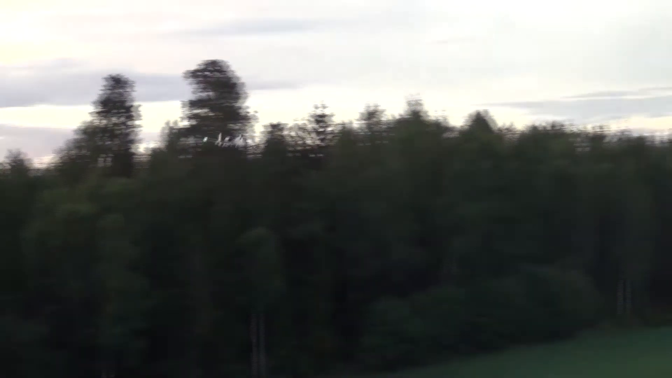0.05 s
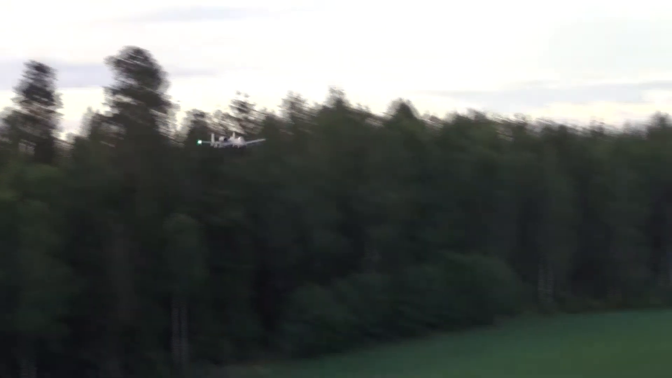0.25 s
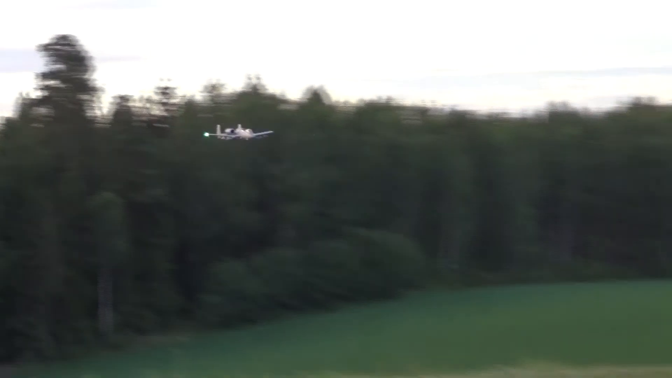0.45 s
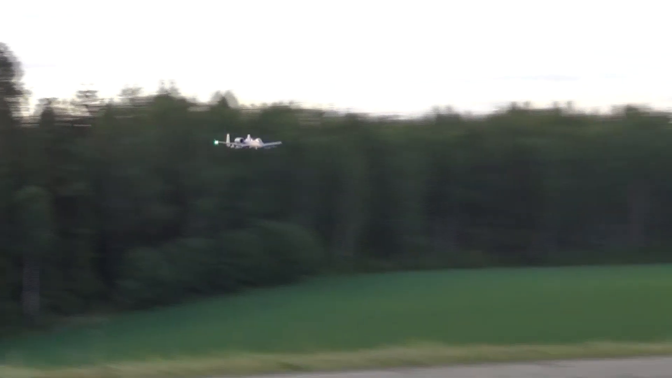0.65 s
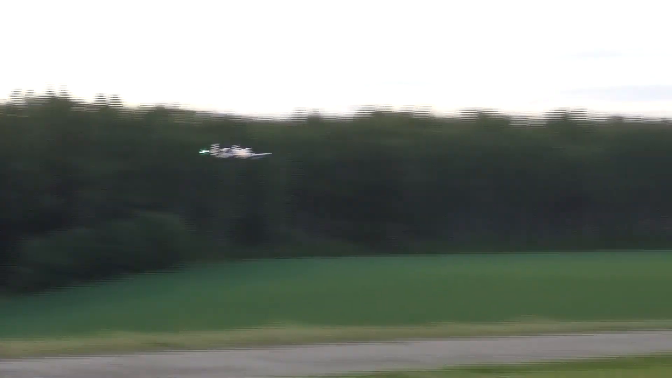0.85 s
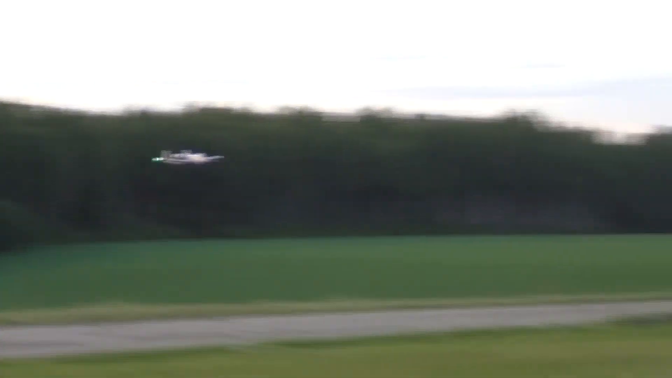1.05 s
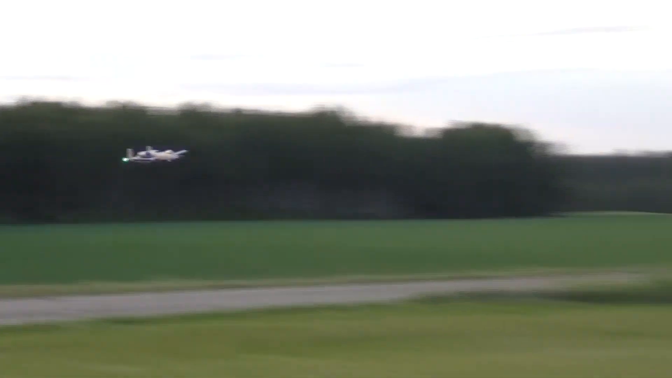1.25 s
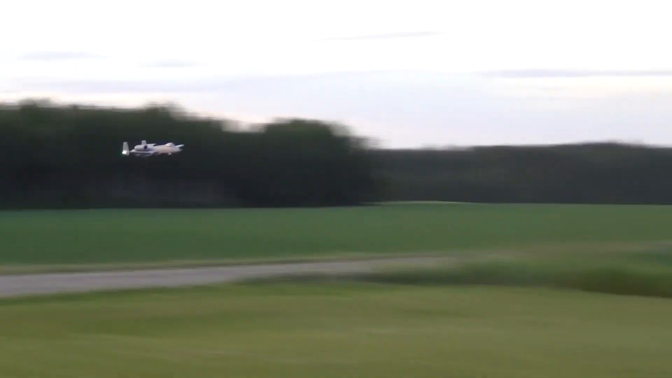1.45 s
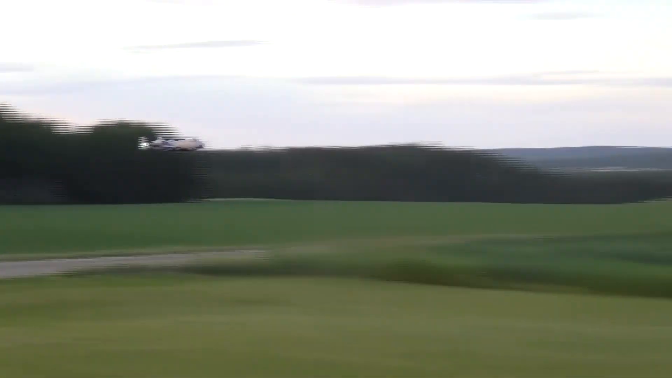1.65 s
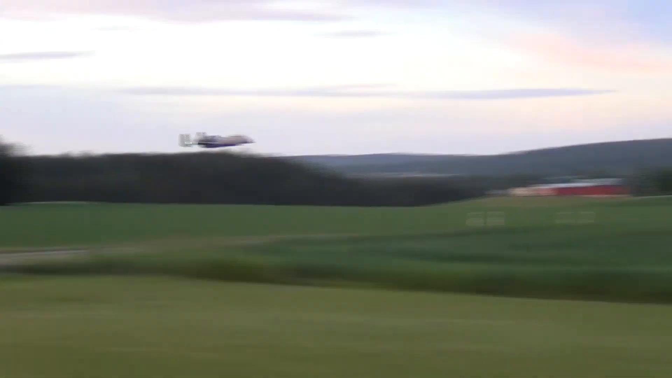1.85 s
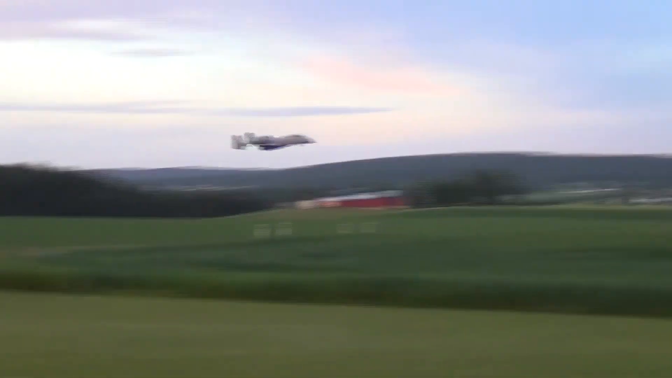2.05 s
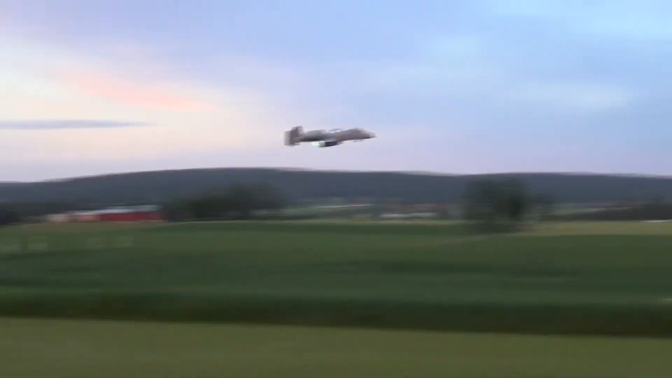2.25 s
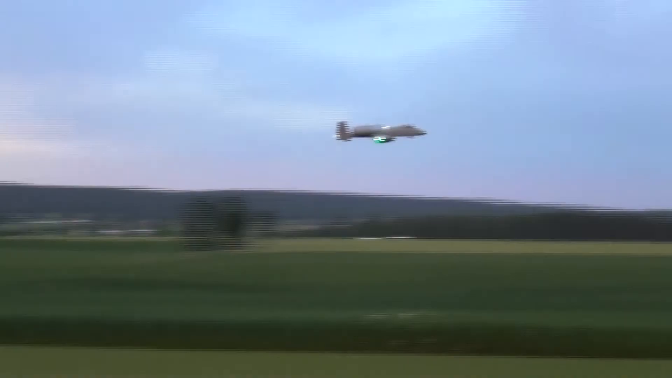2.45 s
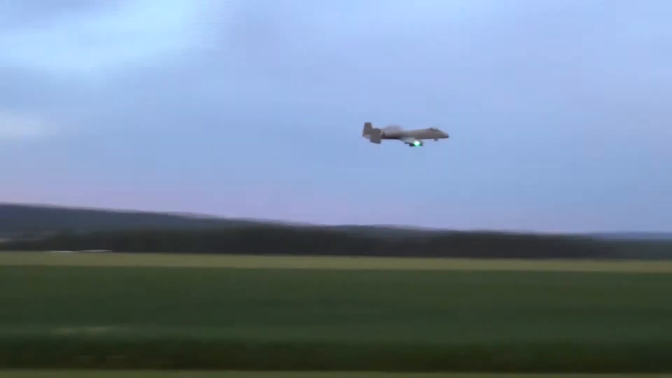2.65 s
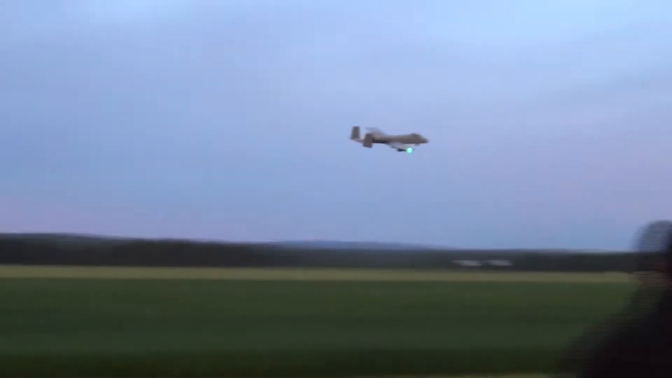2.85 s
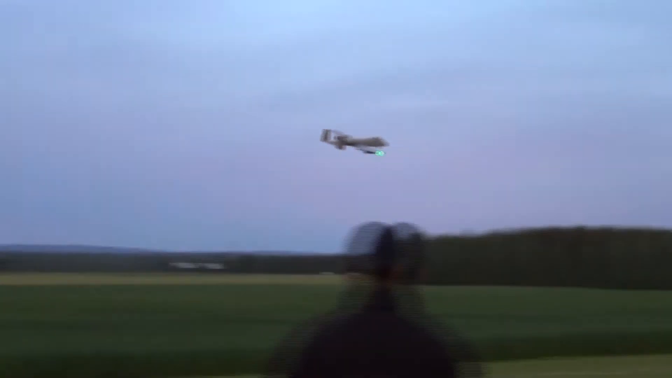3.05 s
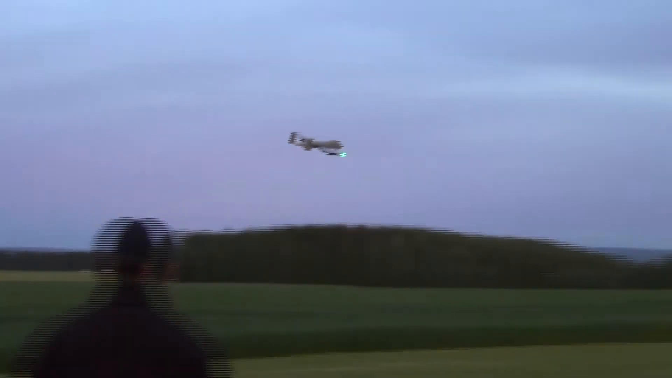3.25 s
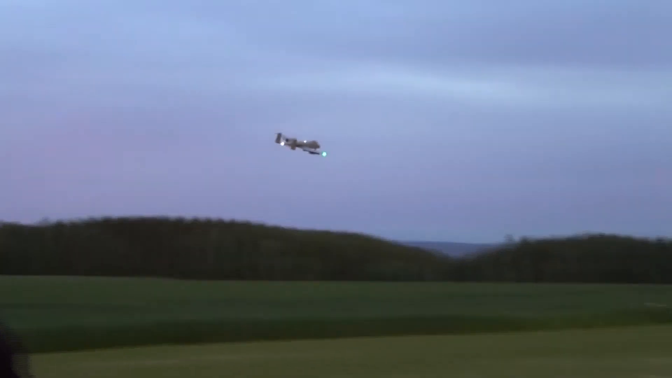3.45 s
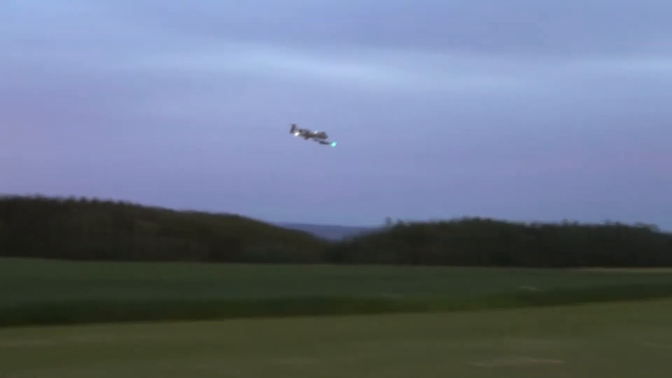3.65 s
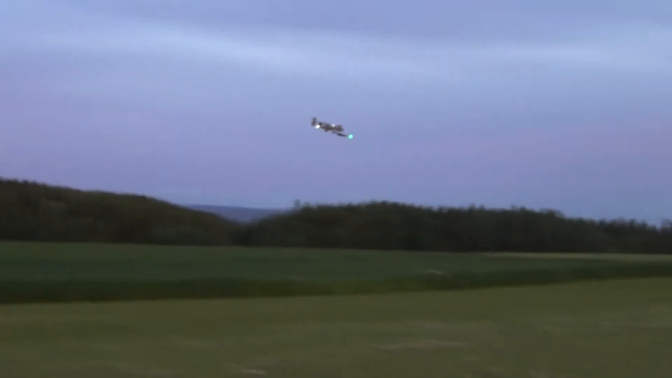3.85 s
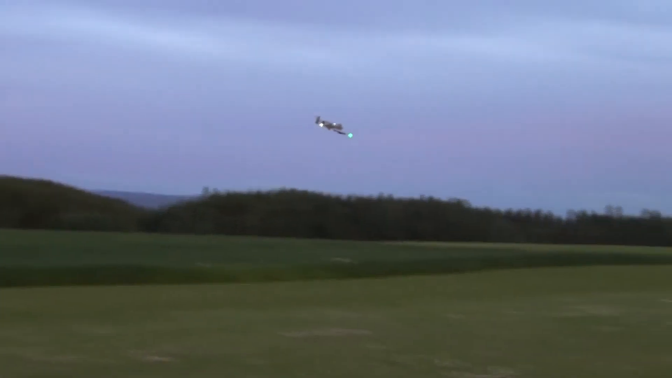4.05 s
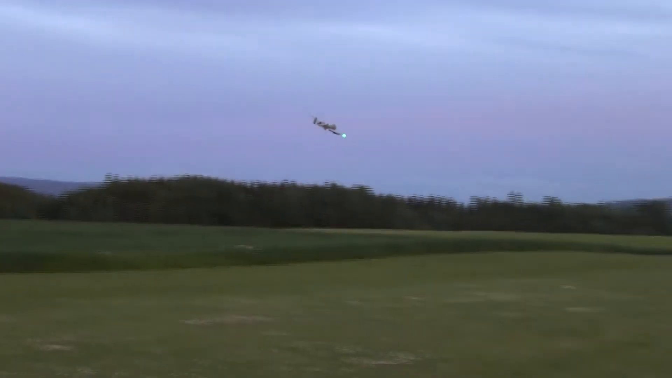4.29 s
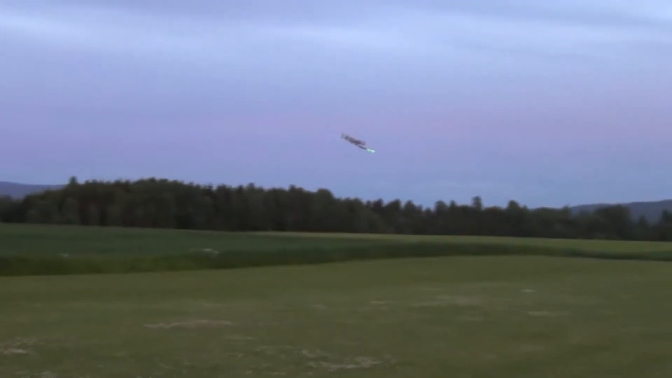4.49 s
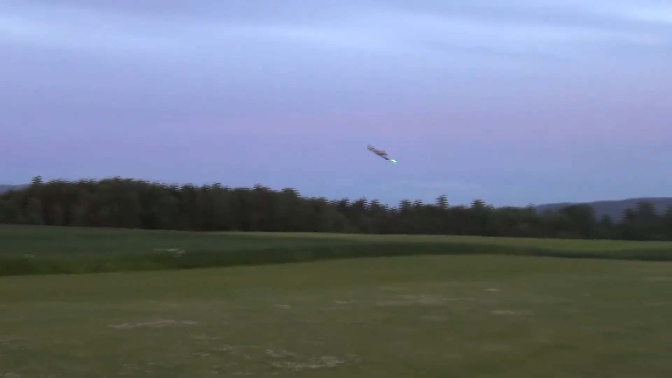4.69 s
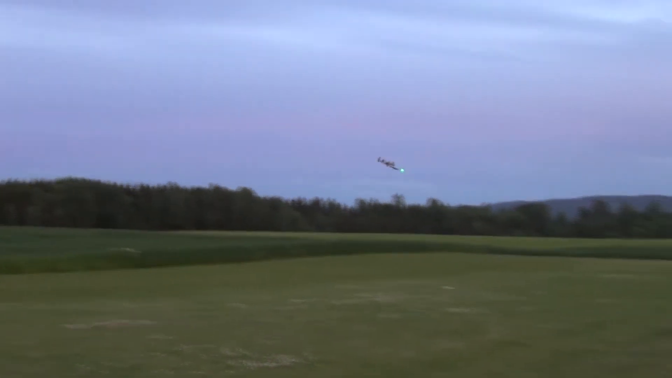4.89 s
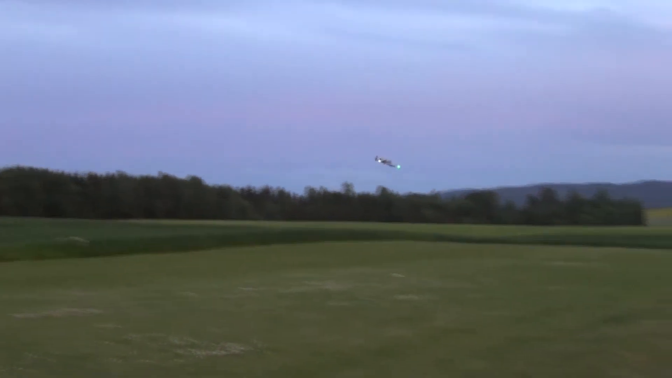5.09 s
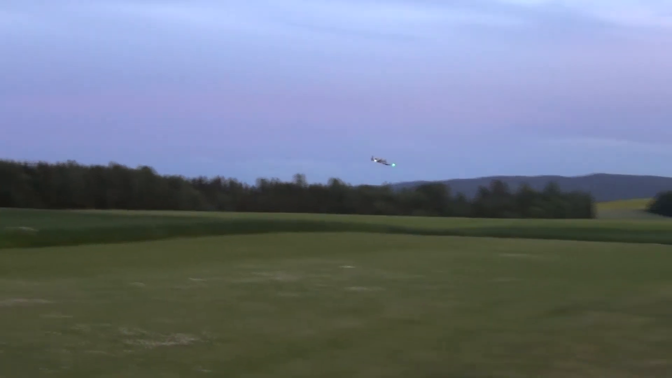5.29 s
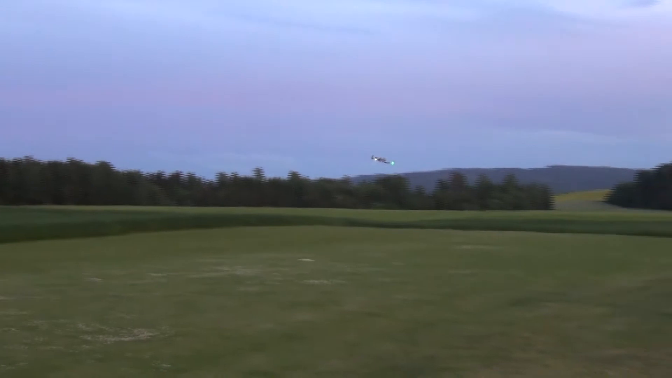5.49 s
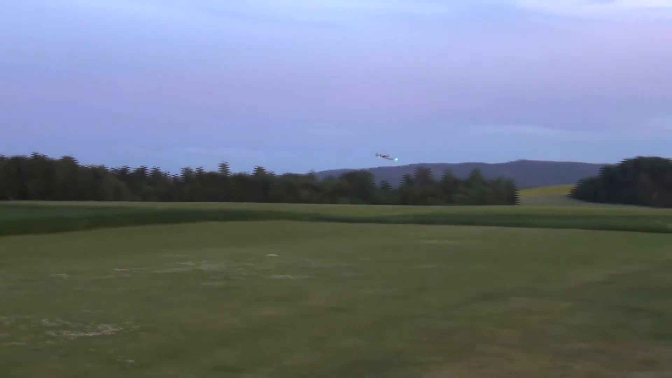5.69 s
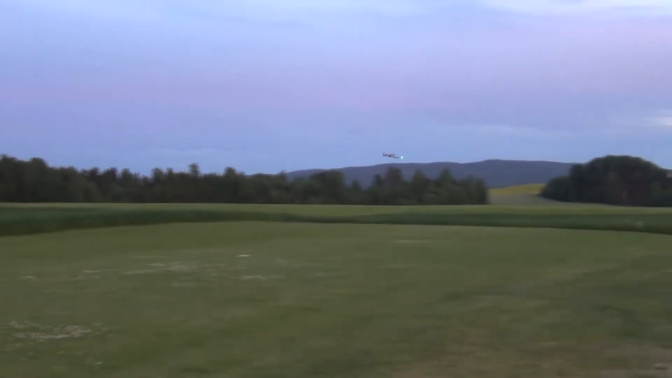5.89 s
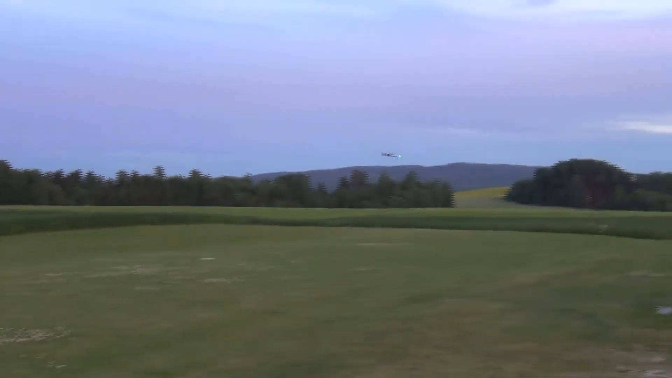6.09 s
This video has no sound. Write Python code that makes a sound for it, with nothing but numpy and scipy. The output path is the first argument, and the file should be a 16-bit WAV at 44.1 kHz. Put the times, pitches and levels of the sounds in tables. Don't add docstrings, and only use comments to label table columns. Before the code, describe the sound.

In open air over a grass field, a small electric jet with two ducted fans is already approaching at 0 s, giving a hard, piercing whine near 3.8 kHz, with fainter whistles above it and a broad, rushing air roar. The two fans are slightly detuned, so the tone beats and shimmers, swelling irregularly. Light wind bumps build from about 0.7 s, and at 1.1 s a strong, low gust thuds and rumbles on the close stereo microphone, thinning gradually until about 2.6 s. Around 2 to 3 s the jet passes nearest and every tone glides smoothly downward, reaching roughly 3.2 kHz. From 3 s the wind is nearly gone; the jet recedes as a lower, weaker, fluttering whine and hiss, its upper sound dulling further around 4.5 s. A small wind tick comes near 4.8 s. By 6 s the distant whine is still audible, wavering over faint hiss.

```python
import sys
import numpy as np
from scipy import signal
from scipy.fft import rfft, irfft, next_fast_len
from scipy.io import wavfile
from scipy.ndimage import uniform_filter1d, map_coordinates

SR = 44100
rng = np.random.default_rng(int(sys.argv[2]) if len(sys.argv) > 2 else 0)


def persist_wave(psi):
    counts = np.round(np.clip(psi, -1, 1) * 32767).astype(np.int16)
    wavfile.write(sys.argv[1], SR, np.atleast_2d(counts).T)


def undo_db(level):
    steps = np.asarray(level, float) / 20
    return 10 ** steps


N = 270316

HISS_DB, FIELD_DB = -63, -80.5

# start_s, level_db
DRAUGHT = [(0, -58), (.38, -51), (.63, -55), (1.09, -64), (1.13, -35.5), (2.6, -41), (2.8, -48.5),
           (3.2, -56.5), (3.5, -69.5)]
# start_s, centre_hz, below_db_per_octave,
# above_db_per_octave
GUST_SPECTRUM = [(0, 88.5, 5.5, -5), (1.05, 90, 5, -8.5), (1.15, 136, 11, -8.5), (1.4, 198, 11.5, -9),
                 (1.7, 244, 10, -3.5), (2.4, 308, 12.5, -6), (3.0, 216, 9, -2), (3.5, 160, 11, -7),
                 (6.13, 160, 2, -18)]
# peak_s, peak_db, length_s
BUFFETS = [(.75, -39, 0.048), (0.908, -38, 0.079), (1.05, -37.5, 0.017), (1.138, -29, 0.018),
           (1.208, -30, 0.044), (1.315, -28.5, 0.12), (1.472, -30.5, 0.03), (1.638, -37, 0.062),
           (1.784, -33, 0.048), (1.973, -32, 0.051), (2.082, -36, 0.037), (2.3, -34.5, 0.088),
           (2.41, -32.5, 0.029), (2.56, -37.5, 0.18), (3.043, -50, 0.074), (3.31, -62, 0.056),
           (3.693, -67, .035), (3.835, -75, .022), (3.887, -65, .038), (4.293, -65, .036),
           (4.835, -49, 0.012), (4.862, -54, 0.03), (4.932, -67, .02), (5.03, -74, 0.053),
           (5.257, -74, .04), (5.431, -61, 0.0098), (5.76, -75, .03), (5.95, -70, .03)]

# start_s, centred_share (0-1)
CAMERA_SWING = [
    (0, 0.4),
    (2.2, 0),
    (3.4, 0.64),
    (6.13, 1),
]
# band_hz, left_minus_right_db
CAPSULES_LEFT = [(40, -4), (70, -11), (130, 3.5), (290, 0.2), (640, 1), (1350, 4), (1900, -1.5),
                 (2450, 2.7), (2900, -2), (3650, 2.16), (4600, -1.8), (7000, 1.8), (9500, 1.6), (15000, 2)]
# band_hz, left_minus_right_db
CAPSULES_CENTRED = [(60, -.5), (130, 5.5), (640, 2), (1400, 1.2), (2000, 1), (4500, 0.55), (7500, 1.3),
                    (10000, -7)]
BODY_NOTCH_HZ, BODY_NOTCH_WIDTH_HZ = 1823, 340

ABEAM_S, SPEED_M_S, SLOWING_M_S2, NEAREST_M = 2.50, 29.69, .52, 26.31
# start_s, jet_height_m, echo_strength (0-1)
FLIGHT_HEIGHT = [(0, 7.4, 0.05), (.8, 4.3, 0.2), (1.3, 3.26, 0.4), (1.8, 2.22, 0.3), (2.1, 3.15, 0.3),
                 (2.4, 3.56, 0.5), (2.8, 4.17, 0.32), (3.2, 5, 0.26), (3.6, 5.74, 0.42), (4.2, 6.37, 0.28),
                 (4.8, 6.7, 0.4), (5.6, 6.8, 0.32), (6.13, 7.9, 0.35)]
MIC_HEIGHT_M, GRASS_CUT_HZ, GRASS_TURN_RAD = 1.6, 4700, -1.35

# centre_s, half_length_s, gain_db, fast_fan_favour_db
FOCUSING_EDDIES = [(.15, 0.057, 4.5, -1.5), (0.69, 0.098, 7.5, 7), (0.957, 0.056, 9.5, 5.5),
                   (1.176, 0.11, 4.5, 6), (1.295, 0.057, 6.5, -6), (1.438, 0.044, 3.5, -9),
                   (1.558, 0.094, 4.5, -1), (1.764, 0.098, 7.5, 6), (1.96, 0.035, 5, -8.5),
                   (2.07, 0.047, 6.5, -0.5), (2.207, 0.035, 3, -3.5), (2.33, 0.06, 4, -1.5),
                   (2.505, 0.024, 5.5, 7.5), (2.616, 0.056, 5.5, 3), (2.785, 0.02, 6, 2),
                   (3.005, 0.1, 5, 6.5), (3.078, .015, 4.5, 7), (3.213, 0.075, 3, -3.5),
                   (3.414, 0.06, 6, 8.5), (3.63, 0.054, 4.5, 2), (3.796, 0.082, 2.5, -4),
                   (4.075, 0.066, 4.5, -9.5), (4.204, .04, 3, -2), (4.42, 0.057, -2, 7),
                   (4.937, 0.074, 4, -8), (5.158, 0.13, 5.5, 5), (5.405, 0.073, 6, 4),
                   (5.827, 0.065, 11, -4)]
EDDY_ROAR_SHARE = [0.15, 0.2, 0.22, 1.0]
SHADOW_ROAR_SHARE = [.35, .45, .7, 1.0]
BLADE_EDDY_SHARE, HIGH_EDDY_SHARE, FAVOUR_SHARE = 0.63, 0.74, 0.2
BANK_S, BANK_LENGTH_S, SHADOW_DB = 4.487, .07, -9.5

# low_roar_hz, duct_band_hz, middle_hz, hiss_hz
ROAR_ANCHORS_HZ = [750, 1350, 2600, 7000]
# band_hz, relative_db_per_hz
ROAR_SPECTRUM = [(300, -13), (450, -12), (600, -2.5), (950, -3.5), (1400, 5), (2200, 2.5), (3500, 3.5),
                 (4500, -2.5), (5300, -1.5), (6300, -2.5), (7700, 3), (9000, -3.5), (10600, -11),
                 (13000, -26.5), (15500, -34)]
# start_s, tilt_db_per_octave
TREBLE_TILT = [(0, -58), (1.5, 9), (2.4, -1), (3.1, 10), (4.2, -9), (6.13, -26)]
# band_hz, side_re_mid_db
ROAR_WIDTH = [(300, -3), (1300, -27), (2000, -58), (4500, -23), (7500, -47), (15000, -88)]
# off_nose_deg, low_roar_db, duct_band_db, middle_db, hiss_db
ROAR_BEAM = [(19, -43, -39, -39.5, -42.5), (31, -40.5, -43.5, -44.5, -46), (40.8, -44, -46, -40.5, -46),
             (72, -43, -36, -46, -46.5), (97, -47, -40, -47.5, -47), (133.6, -49.5, -47, -46, -46.5),
             (148.3, -50, -41.5, -46, -45.5), (140.7, -52.5, -48, -47.5, -49),
             (173.6, -41, -41.5, -39, -42.5)]

BLADE_HZ, SWITCH_RATIO, FADING_DB = 3449.6, 1.0097, 2.2
# start_s, slow_re_fast_ratio, whistle_re_fast_blade_ratio
THROTTLE_EASING = [
    (2.0, .9918, 2.3203),
    (2.9, .9925, 2.3197),
    (3.35, .9942, 2.3245),
    (4.2, .9931, 2.3250),
]
ORDER_ASPECTS_DEG = [26, 66, 115, 153, 161]
FAST_ORDERS = {2: [-27, -17, -32, -22.5, -32], 4: [-20, -22, -29, -15.5, -21], 6: [-24, -28, -23, -26, -29],
               8: [-35, -28, -23, -22, -30], 10: [-18.5, -16.5, -22, -35, -22], 12: [-18.5, -23, -33, -26.5,
               -34], 16: [-12.5, -39, -33, -37, -27], 20: [-14.5, -9, -34, -26, -18], 24: [-38, -36, -31,
               -33, -22], 27: [-36, -25, -18, -21, -39], 30: [-48, -33, -34, -35, -39], 40: [-70, -54, -41,
               -43, -40]}
SLOW_ORDERS = {4: [-31, -36, -34, -17, -19.5], 8: [-41, -40, -29, -15, -17], 10: [-18, -20, -30, -21, -26],
               12: [-28, -13, -36, -35, -17], 16: [-29, -33, -27, -16.5, -30], 20: [-20, -17, -19, -29,
               -19], 24: [-36, -33, -26, -23, -29], 27: [-73, -27, -17.5, -19, -24], 30: [-38, -38, -40,
               -33, -37], 36: [-60, -52, -45, -48, -52], 40: [-72, -48, -37, -31, -45]}
WHISTLE_SIDEBAND = [
    [-43, -37, -36, -37, -38],
    [-42, -33, -26, -47, -48],
]
# off_nose_deg, fast_db, slow_db, fast_2nd_harmonic_db,
# slow_2nd_harmonic_db
BLADE_TONE_BEAM = [(22.8, -26.5, -33, -39.5, -43), (28.6, -31.5, -40.5, -40.5, -39),
                   (39.4, -33.5, -42, -32.5, -41.5), (52.7, -30, -36.5, -38.5, -38),
                   (72, -30.5, -45, -43.5, -44), (86.3, -41, -44, -46, -46),
                   (93.7, -36.5, -49.5, -46.5, -56), (106, -44, -32.5, -41.5, -51),
                   (122.4, -48, -45.5, -54.5, -52), (134.4, -46, -42, -51, -44),
                   (137.7, -57, -49.5, -54, -55), (140.7, -44, -40, -57, -39.5),
                   (148.7, -52, -58, -78, -55.5), (160, -56.5, -54, -49.5, -50),
                   (170.6, -54, -48.5, -40, -37)]
# off_nose_deg, fast_motor_db, slow_motor_db
SWITCHING_BEAM = [(22, -60, -47), (29, -46, -50), (40.6, -45, -46), (66, -40.5, -43.5), (98, -48, -38.5),
                  (127, -50, -41.5), (145, -48, -49), (157, -52, -56), (157, -50, -52)]


def in_time(rows):
    time_s, *columns = np.transpose(rows)
    return [np.interp(np.arange(N) / SR, time_s, column) for column in columns]


def at_hz(points, hz):
    table_hz, table_db = np.array(points).T
    return np.interp(np.log(hz), np.log(table_hz), table_db)


def rms_one(x):
    return x / np.sqrt(np.mean(x ** 2))


def butter(x, hz, kind, order=2):
    return signal.sosfilt(signal.butter(order, hz, kind, fs=SR, output="sos"), x)


def drift(rate_hz):
    pole = np.exp(-80 * np.pi * rate_hz / SR)
    white = rng.standard_normal(N // 40 + 2002)
    slow = signal.lfilter([1], [1, -2 * pole, pole * pole], white)[2000:]
    return np.interp(np.arange(N) / 40, np.arange(len(slow)), rms_one(slow))


def field():
    return undo_db(FIELD_DB) * rms_one(butter(rng.standard_normal(N), [50, 500], "band", order=1))


def gust():
    centre_hz, below, above = in_time(GUST_SPECTRUM)
    t = np.arange(N) / SR
    level = undo_db(in_time(DRAUGHT + [(3.6, -78.5)])[0])
    for peak_s, peak_db, length_s in BUFFETS:
        level = level + undo_db(peak_db) * np.exp(-((t - peak_s) / length_s) ** 2)
    white = rng.standard_normal((2, 2, N))
    rumble = 0
    for k, hz in enumerate(np.geomspace(35, 1000, 11)):
        octaves = np.log2(hz / centre_hz)
        shape_db = np.where(octaves < 0, below, above) * octaves
        band = rms_one(butter(white[k % 2], [hz / 1.205, hz * 1.23], "band"))
        rumble = rumble + undo_db(shape_db + 0.77 * drift(5.3)) * band
    closed = np.clip((below - 5.0) / 2.3, 0, 1)
    rumble = (1 - closed) * rumble + closed * butter(rumble, 95, "high", order=3)
    return level * undo_db(-4.0 + 1.34 * drift(35)) * rumble * [[1], [undo_db(-17)]]


def capsules(mid):
    size = next_fast_len(N)
    hz = np.arange(1, size // 2 + 2) * SR / size
    spectrum = rfft(mid, size)
    left, centre = [irfft(spectrum * np.tanh(at_hz(table, hz) * np.log(10) / 40), size)[:N]
                    for table in (CAPSULES_LEFT, CAPSULES_CENTRED)]
    centred = np.clip(in_time(CAMERA_SWING)[0], 0, 1)
    return (1 - centred) * left + centred * centre


def camera_body(x):
    r = np.exp(-np.pi * BODY_NOTCH_WIDTH_HZ / SR)
    c = -2 * np.cos(2 * np.pi * BODY_NOTCH_HZ / SR)
    return signal.lfilter([1, c * r ** 0.41, r ** 0.97], [1, c * r, r * r], x)


def passing():
    t = np.arange(N) / SR - ABEAM_S
    along_m = SPEED_M_S * t - SLOWING_M_S2 * t ** 2 / 2
    speed_m_s = SPEED_M_S - SLOWING_M_S2 * t
    distance_m = np.hypot(along_m, NEAREST_M)
    off_nose_deg = np.degrees(np.arccos(-along_m / distance_m))
    return distance_m, off_nose_deg, 1 - speed_m_s * along_m / distance_m / 343


def beam(table):
    distance_m, off_nose_deg, _ = passing()
    angle_deg, *columns = np.transpose(table)
    spreading_db = 20 * np.log10(distance_m / NEAREST_M)
    return [np.interp(off_nose_deg, angle_deg, column) - spreading_db for column in columns]


def air():
    t = np.arange(0, N, 40) / SR
    centre_s, length_s, gain_db, favour_db = np.transpose(FOCUSING_EDDIES)[:, :, None]
    bell = np.exp(-((t - centre_s) / length_s) ** 2)
    shadow_db = SHADOW_DB * (1 + np.tanh((t - BANK_S) / BANK_LENGTH_S)) / 2
    curves = (gain_db * bell).sum(0), (favour_db * bell).sum(0), shadow_db
    return [np.interp(np.arange(N) / SR, t, curve) for curve in curves]


def ground(x):
    height_m, strength = in_time(FLIGHT_HEIGHT)
    lag_ms = 2 * height_m * MIC_HEIGHT_M / passing()[0] / .343
    analytic = signal.hilbert(x, next_fast_len(N))[:N]
    turned = np.real(analytic * np.exp(1j * GRASS_TURN_RAD))
    dull = butter(turned, GRASS_CUT_HZ, "low", order=1)
    read_at = np.arange(N) - lag_ms * SR / 1000
    echo = map_coordinates(dull, [read_at], order=1, mode="nearest")
    return (x + strength * echo) / np.sqrt(1 + strength ** 2)


def jet_levels():
    eddy_db, _, shadow_db = air()
    rows = zip(beam(ROAR_BEAM), EDDY_ROAR_SHARE, SHADOW_ROAR_SHARE)
    return [db + eddy * eddy_db + shadow * shadow_db for db, eddy, shadow in rows]


def roar(levels_db, patchy_db):
    edges_hz = np.geomspace(250, 15900, 25)
    white = rng.standard_normal((2, 2, N))
    together = drift(1.9)
    tilt = in_time(TREBLE_TILT)[0]
    out = 0
    for k, (low, high) in enumerate(zip(edges_hz, edges_hz[1:])):
        hz = np.sqrt(low * high)
        place = np.interp(np.log(hz), np.log(ROAR_ANCHORS_HZ), range(4))
        near = min(int(place), 2)
        db = levels_db[near] + (place - near) * (levels_db[near + 1] - levels_db[near])
        db = db + at_hz(ROAR_SPECTRUM, hz) + tilt * max(np.log2(hz / 9000), 0)
        db = db + np.interp(place, [0, 3], [18.0, 5.5])
        db = db + patchy_db * (0.3 * place * together + drift(13.4))
        mid_side = [[1], [undo_db(at_hz(ROAR_WIDTH, hz))]]
        out = out + undo_db(db) * butter(white[k % 2], [low, high], "band") * mid_side
    return out


def tone(hz, db, flicker_db, wander_us):
    fast = drift(21.0)
    delay_s = wander_us * 1e-6 * (drift(13.3) + 0.52 * fast)
    cycles = np.cumsum(hz) / SR + hz * delay_s + rng.random()
    return np.sqrt(2) * undo_db(db + flicker_db * fast) * np.sin(2 * np.pi * cycles)


def fans(hiss_db):
    _, off_nose_deg, doppler = passing()
    slow_ratio, whistle_ratio = in_time(THROTTLE_EASING)
    fast_hz = BLADE_HZ * doppler
    whistle_hz = fast_hz * whistle_ratio
    blade_db, whistle_db = beam(BLADE_TONE_BEAM), beam(SWITCHING_BEAM)
    eddy_db, favour_db, shadow_db = air()
    motors = [(fast_hz, whistle_hz, FAST_ORDERS),
              (fast_hz * slow_ratio, whistle_hz * SWITCH_RATIO, SLOW_ORDERS)]
    out = 0
    for k, (blade, whistle, orders) in enumerate(motors):
        shaft = blade / 9
        lean_db = favour_db * (-1) ** k
        high_db = HIGH_EDDY_SHARE * eddy_db + lean_db + shadow_db
        high_db = high_db + 0.87 * FADING_DB * drift(6.5)
        first_db = blade_db[k] + BLADE_EDDY_SHARE * eddy_db + FAVOUR_SHARE * lean_db
        out = out + tone(blade, first_db, flicker_db=1.64, wander_us=7.5)
        out = out + tone(2 * blade, blade_db[2 + k] + high_db, flicker_db=2.5, wander_us=9.9)
        out = out + tone(whistle, whistle_db[k] + high_db, flicker_db=1.5, wander_us=22)
        lines = [(order * shaft, db) for order, db in orders.items()]
        lines.append((whistle + 10 * shaft, WHISTLE_SIDEBAND[k]))
        for hz, aspect_db in lines:
            db = hiss_db + np.interp(off_nose_deg, ORDER_ASPECTS_DEG, aspect_db)
            out = out + tone(hz, db + FADING_DB * drift(3.0), flicker_db=3.0, wander_us=19)
    return out


def scene():
    wind, wind_side = gust()
    *roar_db, hiss_db = jet_levels()
    hiss_db = hiss_db + 10.0
    jet, jet_side = roar(roar_db + [hiss_db], patchy_db=1.45)
    jet = camera_body(ground(jet))
    mid = jet + wind + fans(uniform_filter1d(hiss_db, size=3000))
    side = jet_side + wind_side + capsules(mid)
    return np.array([mid + side, mid - side]) + field()


def low_pass(x):
    return signal.sosfilt(signal.butter(12, 15670, fs=SR, output="sos"), x)


def record(dry):
    hiss = undo_db(HISS_DB) * butter(rng.standard_normal(N), 5000, "high", order=1)
    return low_pass(dry + hiss)


dry = scene()
out = record(dry)
persist_wave(out)
```